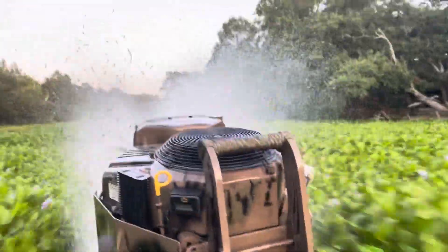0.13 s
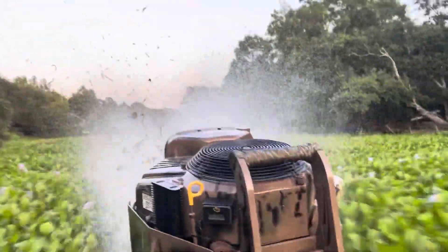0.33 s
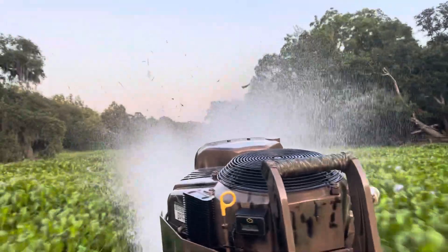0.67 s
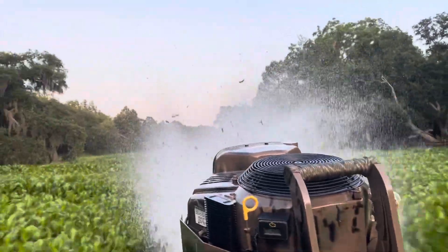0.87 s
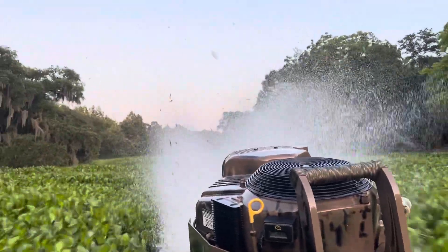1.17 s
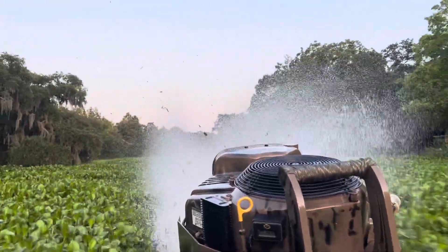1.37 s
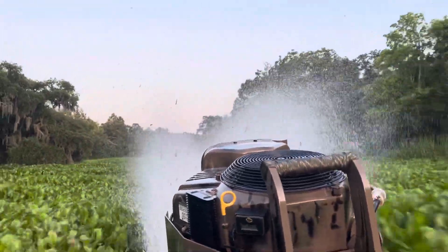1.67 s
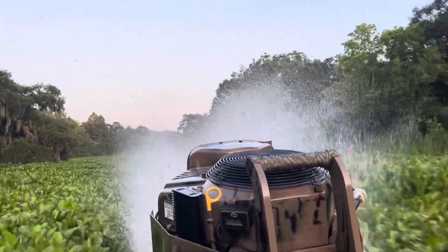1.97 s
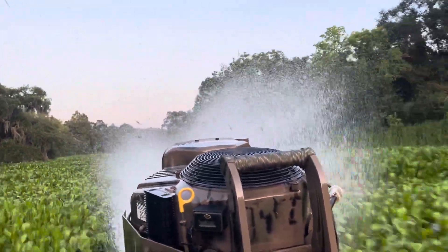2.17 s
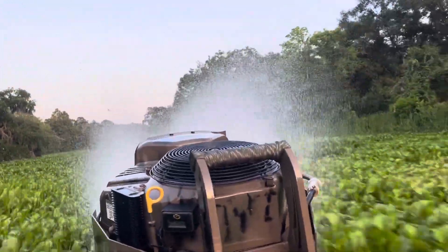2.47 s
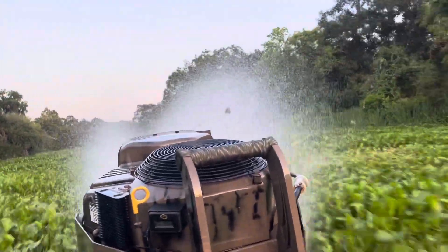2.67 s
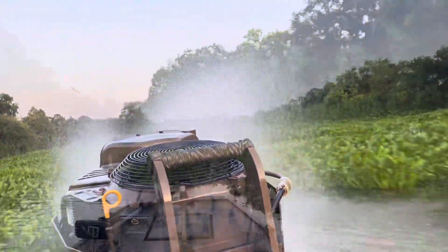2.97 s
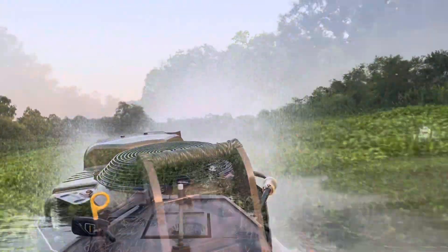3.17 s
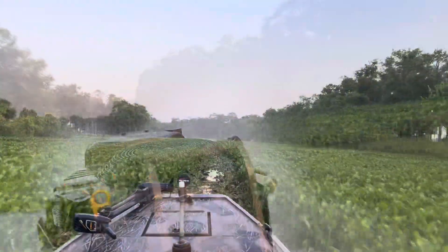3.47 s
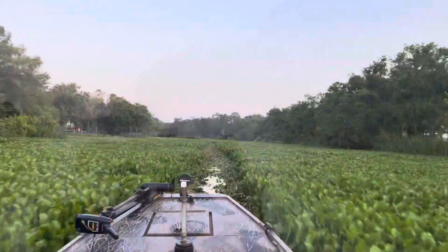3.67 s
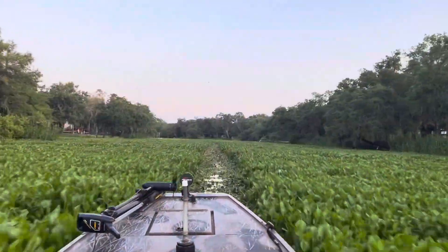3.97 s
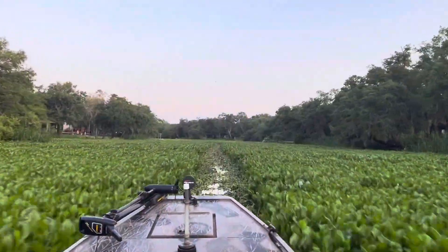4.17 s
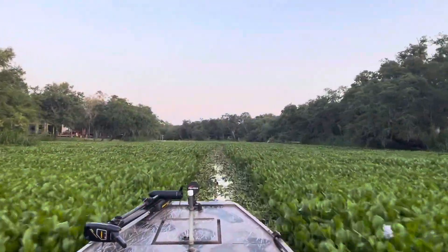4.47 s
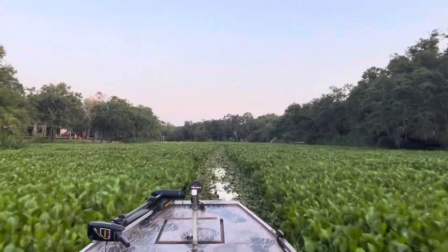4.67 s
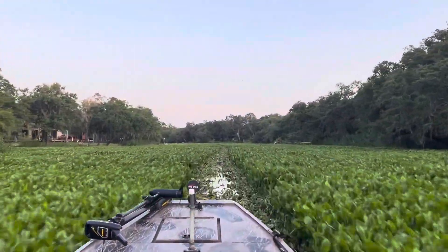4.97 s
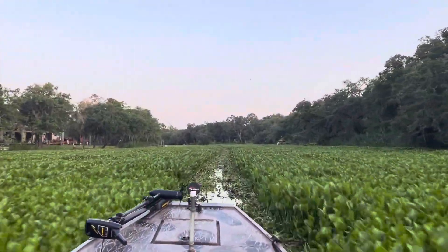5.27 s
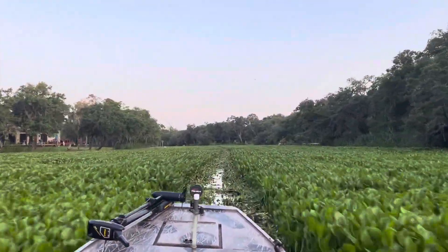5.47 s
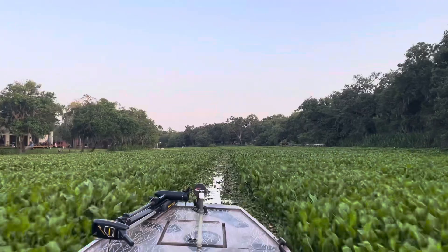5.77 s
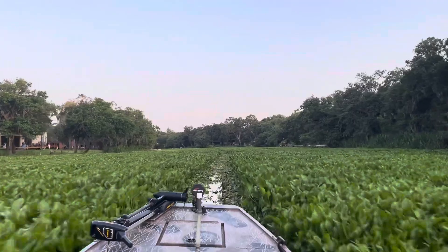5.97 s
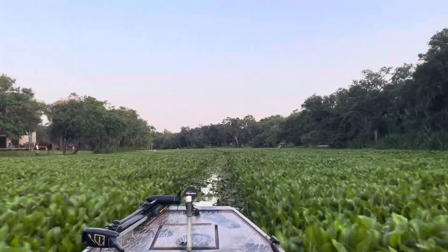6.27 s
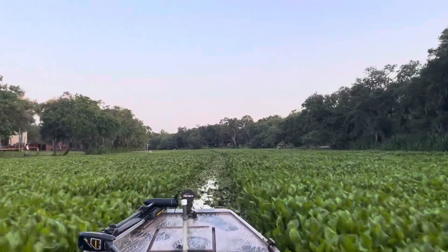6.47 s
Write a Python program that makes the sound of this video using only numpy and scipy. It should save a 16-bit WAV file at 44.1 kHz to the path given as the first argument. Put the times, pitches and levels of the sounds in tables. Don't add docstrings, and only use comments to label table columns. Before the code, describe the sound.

A twin-cylinder boat engine roars at full throttle through floating plants, sags and softens mid-way, then settles into a deeper, humming steady roar.

```python
import sys
import numpy as np
from scipy import signal
from scipy.fft import rfft, irfft, next_fast_len
from scipy.io import wavfile
from scipy.ndimage import uniform_filter1d, map_coordinates

SR = 44100
rng = np.random.default_rng(int(sys.argv[2]) if len(sys.argv) > 2 else 0)


def bounce(signal):
    frames = np.transpose(np.atleast_2d(signal))
    limited = np.clip(frames, -1, 1)
    pcm = np.round(limited * 32767).astype(np.int16)
    wavfile.write(sys.argv[1], SR, pcm)


def natural_amplitude(level_db):
    exponent = np.asarray(level_db, float) / 20
    return 10 ** exponent


N = 291942

# freq_hz, likeness (0-1), right_lead_rad
STERN_PORTS = [(210, .88, 0), (420, .65, -.3), (900, .85, -.5), (1400, .72, -.9), (1900, .6, -1.2),
               (2400, .8, -.6), (3500, .8, -.6), (4100, .45, -.6), (5200, .52, -.6), (6300, .68, -.1),
               (7100, .3, -.7), (7900, .78, -.7), (8550, .995, 0), (9400, .9, 0), (10200, .995, 0),
               (11000, .9, 0), (11700, .985, 0)]
# centre_s, rise_db, half_length_s
GUSTS = [(.72, 2, .2), (1.07, 3.5, 0.05), (1.68, 4.5, 0.11), (2.0, 4.5, 0.14), (2.33, 2.5, 0.11),
         (2.5, -3.5, .06), (2.69, 2.5, 0.06), (2.92, -6, .07), (4.04, 2.5, 0.27), (4.54, 7.5, 0.11),
         (4.89, 3, 0.21), (5.35, 2.5, 0.069), (6.18, 1, .25)]
# start_s, end_s
TURN_S = (1.43, 1.49)


def unit(x):
    return x / np.sqrt(np.mean(x ** 2) + 1e-20)


def curves(rows):
    s, *cols = np.transpose(rows)
    return [np.interp(np.arange(N) / SR, s, c) for c in cols]


def ramp(start_s, end_s):
    return np.clip((np.arange(N) / SR - start_s) / (end_s - start_s), 0, 1)


def swells(rows):
    t = np.arange(N) / SR
    return sum(db * np.exp(-((t - s) / half_s) ** 2) for s, db, half_s in rows)


def wobble(rate):
    knots = rng.standard_normal(int(N * rate / SR) + 4)
    return map_coordinates(knots, [np.arange(N) * rate / SR])


def along(rows, hz):
    f, *cols = np.transpose(rows)
    return [np.interp(np.log(hz + 1), np.log(f), c) for c in cols]


def kinship(ports, hz):
    low_hz, high_hz = 8600, 11750
    f, alike, lead = np.transpose(ports)
    slip = np.clip((hz - low_hz) / (high_hz - low_hz), 0, 1)
    likeness = np.interp(np.log(hz + 1), np.log(f), alike * np.exp(1j * lead))
    return likeness * np.exp(2j * np.pi * slip)


def rush(colour, ports, edges_hz, patchy_db):
    z = signal.stft(rng.standard_normal((2, N)), nperseg=512)[2]
    field = uniform_filter1d(rng.standard_normal(z.shape[1:]), 8, 0)
    field = uniform_filter1d(field, 8, 1)
    pair = signal.istft(z * natural_amplitude(patchy_db * unit(field)), nperseg=512)[1][:, :N]
    size = next_fast_len(N + 8192)
    a, b = rfft(unit(pair), size)
    hz = np.fft.rfftfreq(size, 1 / SR)
    left, right = natural_amplitude(along(colour, hz))
    alike = kinship(ports, hz)
    highpass = 1 + (edges_hz[0] / (hz + 1)) ** 12
    lowpass = 1 + (hz / edges_hz[1]) ** 12
    band = np.sqrt(SR / 2 / highpass / lowpass)
    other = alike * a + np.sqrt(np.abs(1 - np.abs(alike) ** 2)) * b
    return irfft(band * np.array([left * a, right * other]), size)[:, :N]


def tones(rows, turns, ports, unsteady_db, drift):
    out = np.zeros((2, N))
    speed = turns[-1] * SR / N
    for multiple, left_db, right_db in rows:
        phase = 2 * np.pi * (multiple * turns + rng.random()) + drift * wobble(7)
        lead = np.angle(kinship(ports, multiple * speed))
        swell = np.sqrt(2) * natural_amplitude(unsteady_db * wobble(10))
        out += swell * natural_amplitude([[left_db], [right_db]]) * np.sin([phase, phase + lead])
    return out


def orders(rows, low, high):
    return [row for row in rows if low < row[0] <= high]


def propeller_blades(rows, speed, turns, ports, surge_db):
    pipe_hz, pipe_width_hz, off_resonance_db = 299, 8, -18
    detuning = (4 * speed - pipe_hz) / pipe_width_hz
    pipe_db = off_resonance_db * (1 - np.exp(-detuning ** 4))
    wash_rows = orders(rows, 1, 3.95) + orders(rows, 4, 5)
    wash = tones(wash_rows, turns, ports, unsteady_db=1.2, drift=.4)
    piped = tones(orders(rows, 3.95, 4), turns, ports, unsteady_db=1.2, drift=.3)
    return natural_amplitude(surge_db) * (wash + natural_amplitude(pipe_db) * piped)


def churned_water(colour, ports, surge_db):
    noise_in_surge = .45
    return natural_amplitude(0.6 + noise_in_surge * surge_db) * rush(colour, ports, (150, 350), patchy_db=0.75)


def exhaust_roar(rows, turns, colour, ports, throb_db):
    whine_rows = orders(rows, 5, 11.5) + orders(rows, 12, 30)
    whine = tones(whine_rows, turns, ports, unsteady_db=2.8, drift=.55)
    return whine + natural_amplitude(0.16 + 0.4 * throb_db) * rush(colour, ports, (350, 2600), patchy_db=1.13)


def spray_hiss(colour, ports, throb_db, ticks_db):
    ticks = ticks_db * wobble(45)
    return natural_amplitude(0.2 + throb_db + ticks) * rush(colour, ports, (2600, 20000), patchy_db=1.22)


def cooling_fan(rows, speed, turns, ports):
    knee_turns_per_s, db_per_turn, most_db = 75, 2.2, 4.5
    fan_db = np.clip(db_per_turn * (knee_turns_per_s - speed), 0, most_db)
    return natural_amplitude(fan_db) * tones(orders(rows, 11.5, 12), turns, ports, unsteady_db=2.5, drift=.45)


def engine(revs, rows, usual_db, trims_db, colours, ports, beat_db, second_db, ticks_db):
    # time_s, level_db
    load = [(0, -23.5), (.05, -23), (2.0, -23), (2.68, -24), (2.9, -28), (3.05, -28), (3.4, -26),
            (3.55, -24), (3.75, -22), (4.7, -20.8), (5.2, -21.5), (6.62, -22)]
    growths = [1, 0.87, .8, 0.99, 1.1, 0.34]
    # centre_s, change_db, half_length_s
    surges = [(0, -12, .02), (.12, 3, .15), (.42, 2, .12), (.58, -8, .015), (1.09, -6, .015), (1.2, -2, .1),
              (1.39, -6, .07), (1.52, 3, .05), (1.65, -6, .05), (1.76, 4, .04), (1.85, -5, .03),
              (1.93, 2, .04), (2.2, -6, .07), (2.42, 3, .05), (2.55, 4, .04), (2.68, 3, .04), (3.23, 1, .08),
              (4.83, 7, .09), (5.05, -2, .15), (5.9, 2, .3), (6.59, 2.5, .04)]
    speed = curves(revs)[0]
    turns = np.cumsum(speed) / SR
    churn, roar, spray = colours
    throb_db = beat_db * np.cos(np.pi * turns) + second_db * np.cos(2 * np.pi * turns + 1)
    surge_db = swells(surges)
    layers = [
        tones(orders(rows, 0, 1), turns, ports, unsteady_db=.9, drift=.15),
        propeller_blades(rows, speed, turns, ports, surge_db),
        churned_water(churn, ports, surge_db),
        exhaust_roar(rows, turns, roar, ports, throb_db),
        spray_hiss(spray, ports, throb_db, ticks_db),
        cooling_fan(rows, speed, turns, ports),
    ]
    over_db = curves(load)[0] - usual_db
    return [natural_amplitude(growth * over_db + trim_db) * x for growth, trim_db, x in zip(growths, trims_db, layers)]


def trims(before, after, first_s, second_s, hum_in_gust):
    moves = 3 * [ramp(*first_s)] + 3 * [ramp(*second_s)]
    hum, *rest = [a + (b - a) * move for a, b, move in zip(before, after, moves)]
    return [hum + hum_in_gust * swells(GUSTS), *rest]


def deck(x):
    delay_s = 1 / 597
    before, after = 0.85, 0.26
    hz = np.fft.rfftfreq(N, 1 / SR)
    band = 1 / np.sqrt((1 + (1150 / (hz + 1)) ** 8) * (1 + (hz / 3950) ** 16))
    echo = irfft(rfft(x[1]) * band * np.exp(-2j * np.pi * hz * delay_s), N)
    strength = before + (after - before) * ramp(1.4, 1.75)
    return np.array([x[0], x[1] + strength * echo])


def stern_view():
    # time_s, turns_per_s
    stern_revs = [(0, 77.4), (.3, 77.2), (.6, 75.75), (1, 75.3), (1.75, 75.8), (2.05, 74.4), (2.4, 72.9),
                  (2.85, 68.7), (3.6, 62)]
    # multiple_of_crank_speed, left_db, right_db
    stern_tones = [(0.999, -24, -23), (1.496, -41, -40), (2.34, -44, -34), (2.47, -32, -39),
                   (2.63, -25, -19), (3.005, -44, -32), (3.63, -41, -40), (3.817, -37, -30),
                   (4, -29, -27.5), (4.515, -34.5, -38.5), (4.996, -42, -37.5), (6.99, -39, -37),
                   (8.04, -46, -42), (10.1, -47, -40), (11.6, -40, -41), (12, -33.5, -40),
                   (13.61, -40, -51), (14.02, -37, -46), (14.4, -42, -47), (15.5, -49, -58),
                   (16.23, -44, -48), (17, -47, -51), (17.52, -47, -39), (17.98, -43, -43), (19, -43, -59),
                   (19.9, -50, -50), (21.2, -44, -53), (23.96, -51, -42), (26.5, -62, -55)]
    # freq_hz, left_db_per_hz, right_db_per_hz
    stern_churn = [(120, -59, -50), (166, -50, -52), (194, -43, -38.5), (235, -46, -43),
                   (268, -51.5, -50.5), (330, -48.5, -47.5), (450, -50, -53)]
    stern_roar = [(268, -51.5, -39), (417, -50, -50), (595, -51.5, -53.5), (786, -54, -56.5),
                  (980, -52, -56), (1286, -56.5, -58.5), (1520, -59, -76), (1770, -61, -63),
                  (2070, -58.5, -63.5), (2400, -65.5, -63), (3000, -61, -62.5)]
    stern_spray = [(2200, -64, -65), (2900, -64, -67.5), (3380, -63.5, -65.5), (4100, -68.5, -69.5),
                   (4980, -62.5, -67.5), (5200, -68, -72.5), (5500, -65, -65.5), (6100, -68, -69.5),
                   (7200, -68, -70.5), (8600, -67, -67.5), (9650, -64, -64), (10140, -61.5, -61.5),
                   (11420, -69, -69.5), (12800, -84, -84)]
    stern_before = [-6, 0.1, 0.2, 0.01, -0.04, -2.5]
    stern_after = [1, -2.5, 1, 0, -1.5, -0.5]
    # start_s, end_s
    spray_left_s = (0.96, 2.6)
    trims_db = trims(stern_before, stern_after, TURN_S, spray_left_s, hum_in_gust=0.9)
    layers = engine(stern_revs, stern_tones, -23, trims_db, (stern_churn, stern_roar, stern_spray),
                    STERN_PORTS, beat_db=1.2, second_db=1.15, ticks_db=0.44)
    return [deck(x) for x in layers]


def buffet():
    # freq_hz, level_db_per_hz
    rumble = [(20, -28), (32, -17.5), (50, -3), (75, 0.5), (110, 2.5), (150, -4.5), (200, -10.5),
              (300, -39)]
    sheltered_db, exposed_db, bow_wind_db = -30, -22.5, -21.5
    share = ramp(2.9, 3.4)
    colour = [(hz, db, db) for hz, db in rumble]
    stern = unit(rush(colour, [(80, .45, 0)], (10, 400), patchy_db=.8))
    bow = unit(rush(colour, [(30, .58, 0), (90, .84, 0)], (10, 400), patchy_db=.8))
    bow = bow * natural_amplitude([[-.2], [.2]])
    stern_db = sheltered_db + (exposed_db - sheltered_db) * ramp(*TURN_S)
    wind = np.sqrt(1 - share) * natural_amplitude(stern_db) * stern + np.sqrt(share) * natural_amplitude(bow_wind_db) * bow
    return natural_amplitude(swells(GUSTS)) * wind


def strikes():
    # start_s, peak_db
    stem_hits = [(0.0653, -13), (0.1166, -11.5), (0.2718, -17), (0.2972, -13), (0.3226, -14), (0.3496, -17),
                 (0.6634, -17), (1.7769, -16), (3.0694, -24)]
    gain_db, t60_s, low_hz = 0.5, 0.022, 3500
    out, t = np.zeros(N), np.arange(SR // 20) / SR
    for s, db in stem_hits:
        decay = natural_amplitude(db + gain_db - 60 * t / t60_s)
        out[round(s * SR):][:len(t)] += decay * rng.standard_normal(len(t))
    hz = np.fft.rfftfreq(N, 1 / SR)
    bright = rfft(out) / (1 + (low_hz / (hz + 1)) ** 4) / (1 + (hz / 12000) ** 16)
    return irfft(bright * np.array([np.ones(len(hz)), kinship(STERN_PORTS, hz)]), N)


def bow_view():
    # time_s, turns_per_s
    bow_revs = [(2.9, 74.85), (3.7, 75.65), (4.0, 75.35), (4.25, 76.4), (4.55, 79.55), (5.0, 77.2),
                (5.6, 77.4), (6.2, 76.4), (6.62, 76.85)]
    # multiple_of_crank_speed, left_db, right_db
    bow_tones = [(0.5, -38, -37), (0.9933, -15, -12.5), (1.318, -28.5, -25), (1.483, -39, -30.5),
                 (2.001, -36.5, -30), (2.294, -39, -32), (2.463, -50, -36), (2.65, -25.5, -21.5),
                 (3.023, -30.5, -27.5), (3.62, -33.5, -38), (3.933, -30.5, -33), (4.03, -35.5, -32.5),
                 (4.5, -60, -34.5), (5, -50, -39.5), (6.5, -46, -42), (7.01, -49, -46), (7.99, -46, -38),
                 (9.5, -43, -41), (10, -52, -44), (10.5, -46, -40), (12, -36, -30), (13.5, -39, -37),
                 (14, -37.5, -33), (15.63, -47, -40.5), (16.02, -41, -40), (18.07, -47, -37.5),
                 (20.15, -42.5, -44), (24.5, -63, -57), (27.3, -57, -56)]
    # freq_hz, left_db_per_hz, right_db_per_hz
    bow_churn = [(120, -47, -39), (165, -41, -41), (206, -44.5, -37.5), (237, -42.5, -40),
                 (264, -46.5, -44.5), (328, -46, -44), (450, -48.5, -48)]
    bow_roar = [(270, -44, -41.5), (410, -52, -49.5), (550, -51.5, -51.5), (720, -55, -50.5),
                (900, -53.5, -47.5), (1100, -55, -49), (1300, -57.5, -51), (1490, -60, -54.5),
                (1880, -64.5, -56.5), (2320, -68.5, -61), (2830, -69, -68), (3300, -70, -67)]
    bow_spray = [(2340, -68, -60), (2880, -69.5, -69.5), (3480, -69.5, -67.5), (4000, -68.5, -67.5),
                 (4800, -67.5, -67), (5800, -66, -68.5), (6700, -67.5, -69), (7400, -73, -70.5),
                 (8500, -74.5, -74.5), (9600, -73, -71.5), (10240, -69, -69), (11470, -79.5, -78.5),
                 (12350, -85, -85), (12800, -100, -100)]
    # freq_hz, likeness (0-1), right_lead_rad
    bow_ports = [(150, .9, -.1), (450, .66, -.4), (850, .92, -1.4), (1500, .8, 0), (2150, .05, -1),
                 (2700, .62, 3), (3250, .15, 2), (3800, .55, .5), (4900, .3, -.7), (5400, .4, 1),
                 (6500, .42, -.7), (7400, .12, -3), (8550, .8, 0), (9400, .8, 0), (10200, .996, 0),
                 (11000, .85, 0), (11700, .999, 0)]
    bow_before = [-2.5, -1, -0.3, 0.2, -1, -3]
    bow_after = [-1, -1.1, -1.1, 0.045, 0.39, 0.28]
    # start_s, end_s
    settle_s = (3.44, 3.55)
    spray_back_s = (3.7, 4.6)
    trims_db = trims(bow_before, bow_after, settle_s, spray_back_s, hum_in_gust=0.041)
    return engine(bow_revs, bow_tones, -21.5, trims_db, (bow_churn, bow_roar, bow_spray),
                  bow_ports, beat_db=0.9, second_db=-1.2, ticks_db=0.5)


def scene():
    # start_s, end_s
    dissolve = [(2.93, 3.15), (2.55, 3.07), (2.64, 3.02), (2.7, 3.46), (2.38, 3.58), (2.68, 2.95)]
    stern, bow = stern_view(), bow_view()
    out = buffet() + strikes()
    for near, far, span in zip(stern, bow, dissolve):
        share = ramp(*span)
        out = out + np.sqrt(1 - share) * near + np.sqrt(share) * far
    return out


def starve(x, under_db, quiet_db, ragged_db):
    mid_side = np.array([x[0] + x[1], x[0] - x[1]]) / 2
    hz, t, z = signal.stft(mid_side, SR, nperseg=2048)
    bands = np.abs(z[:, :1024].reshape(2, 64, 16, -1)) ** 2
    level = np.repeat(np.sqrt(bands.mean(2)), 16, axis=1)
    whim_db = ragged_db * rng.standard_normal(bands.shape[:2] + bands.shape[3:])
    level = level * natural_amplitude(np.repeat(whim_db, 16, axis=1))
    audible = (level > natural_amplitude(under_db) * level[::-1]) & (level > natural_amplitude(quiet_db))
    keep = audible | (hz[:1024, None] < 2500)
    kept = z * np.pad(keep, ((0, 0), (0, 1), (0, 0)))
    mid, side = signal.istft(kept, SR, nperseg=2048)[1][:, :N]
    return np.array([mid + side, mid - side])


def top_cut(x):
    return signal.sosfilt(signal.butter(12, 12930, fs=SR, output="sos"), x)


def record(dry):
    soft = dry / (1 + np.abs(dry / .95) ** 5) ** (1 / 5)
    thinned = starve(soft, under_db=-14, quiet_db=-74, ragged_db=3)
    return top_cut(thinned)


dry = scene()
out = record(dry)
bounce(out)
```